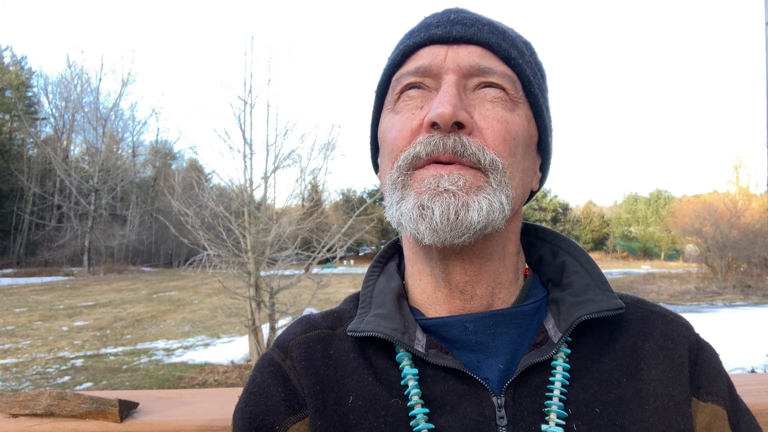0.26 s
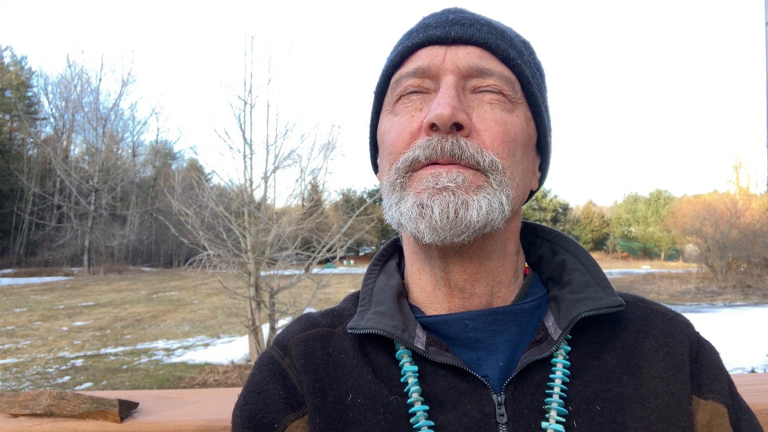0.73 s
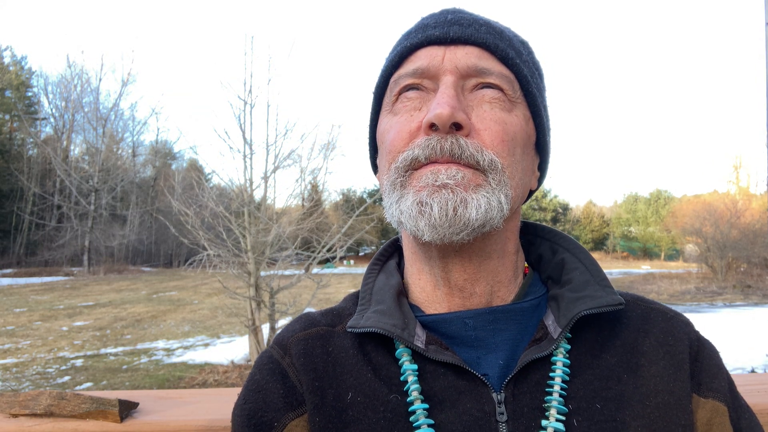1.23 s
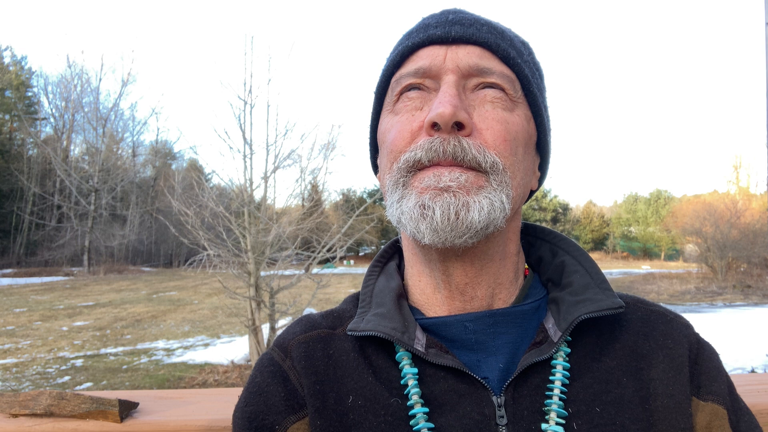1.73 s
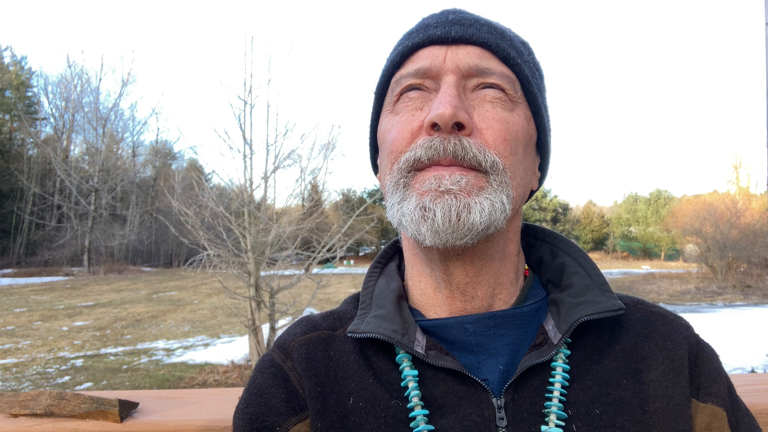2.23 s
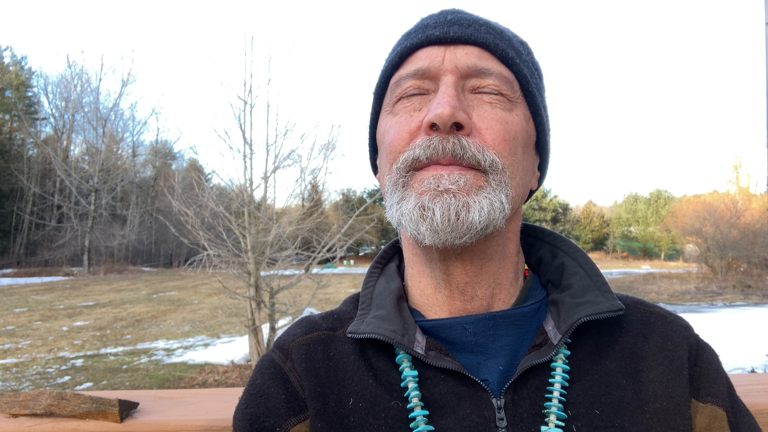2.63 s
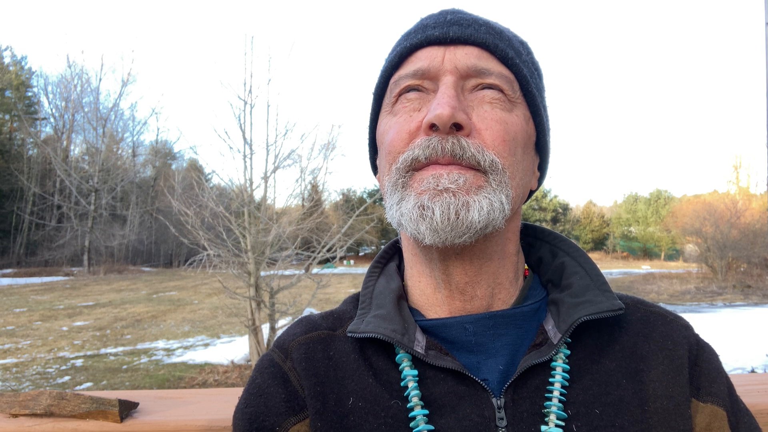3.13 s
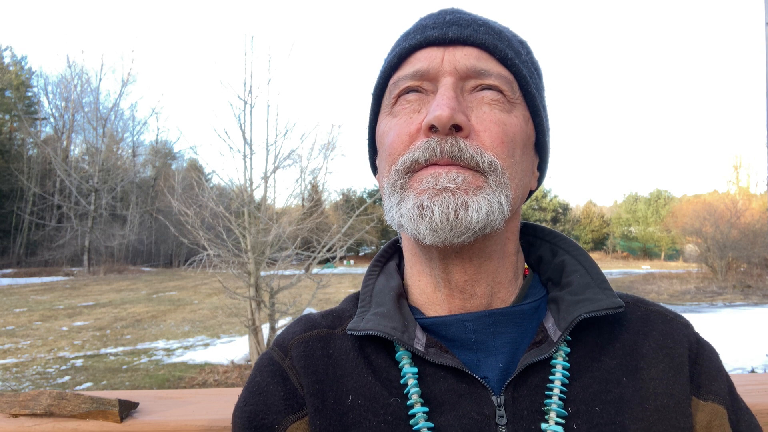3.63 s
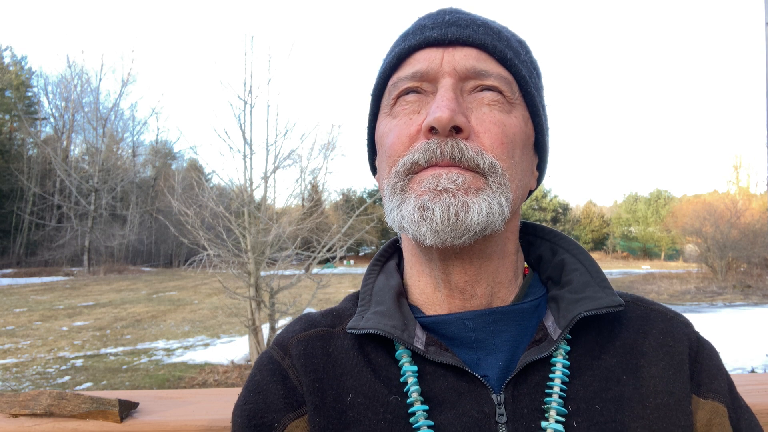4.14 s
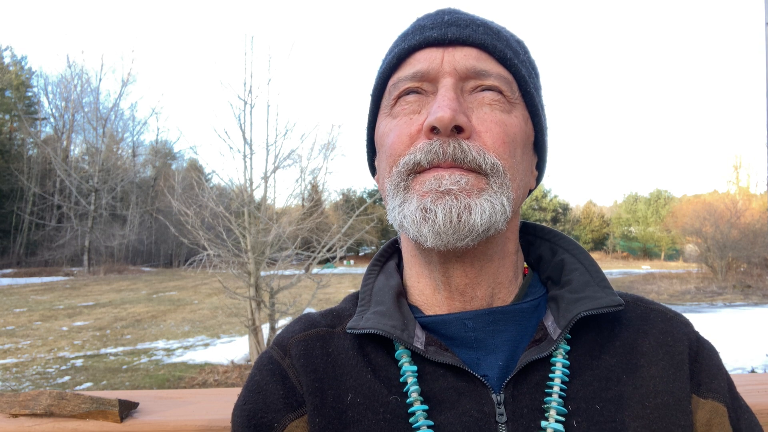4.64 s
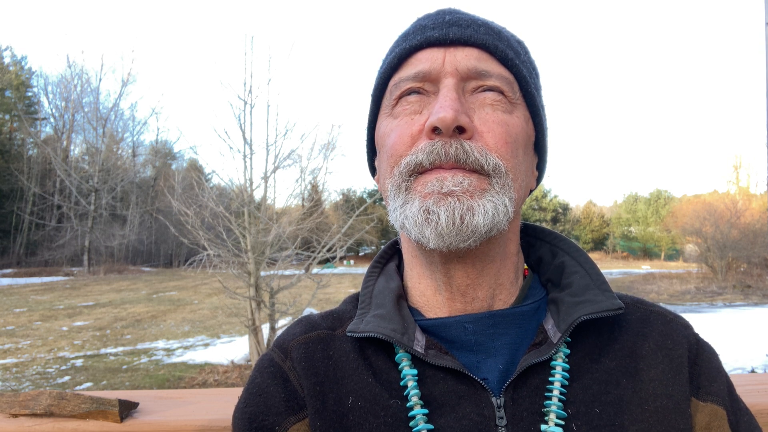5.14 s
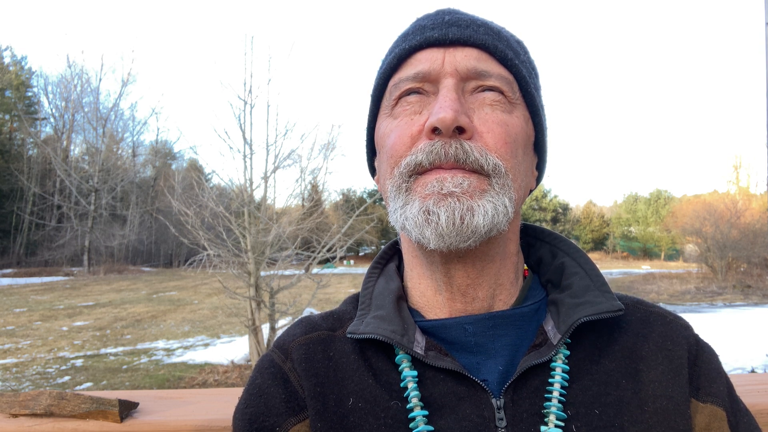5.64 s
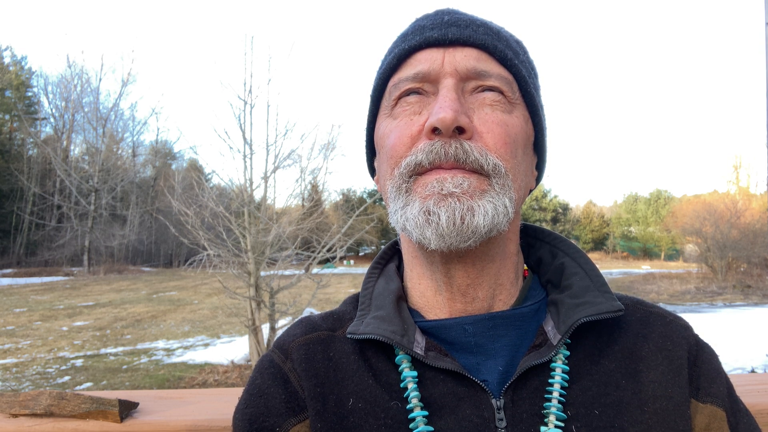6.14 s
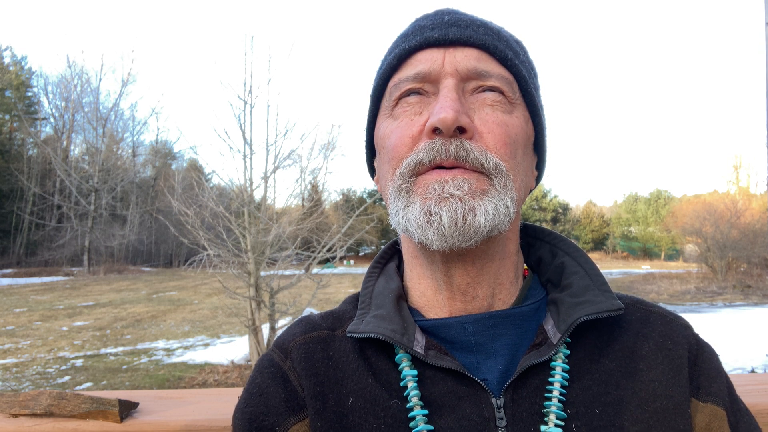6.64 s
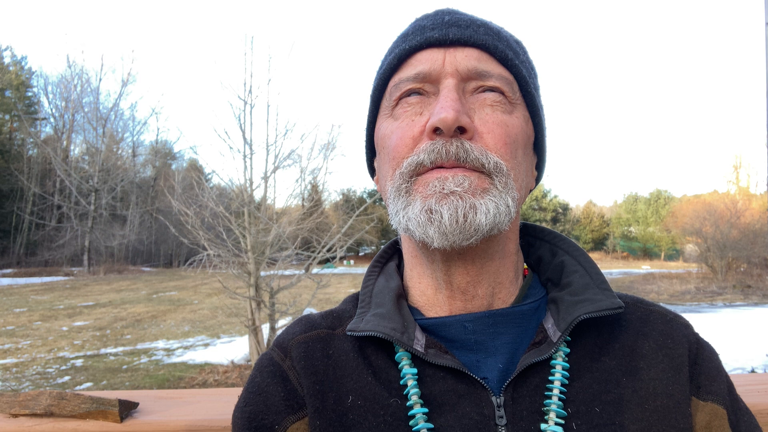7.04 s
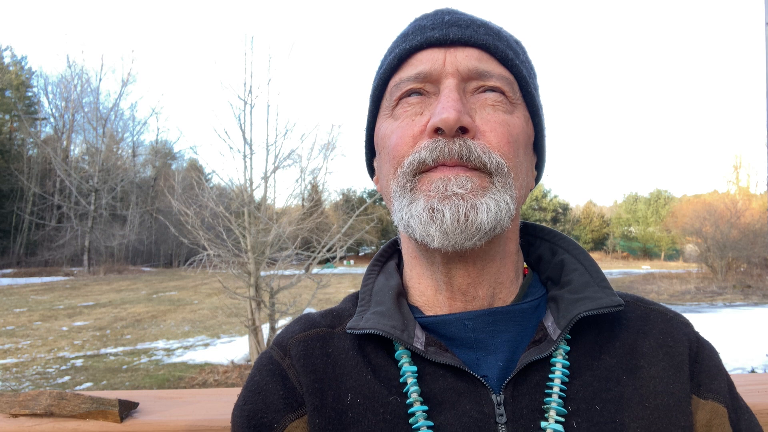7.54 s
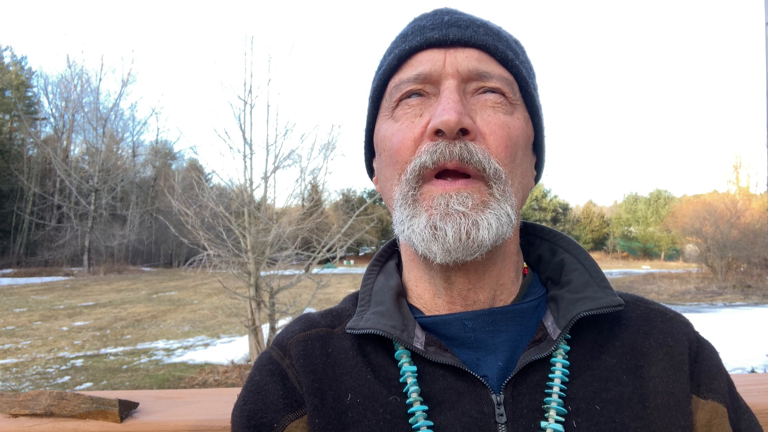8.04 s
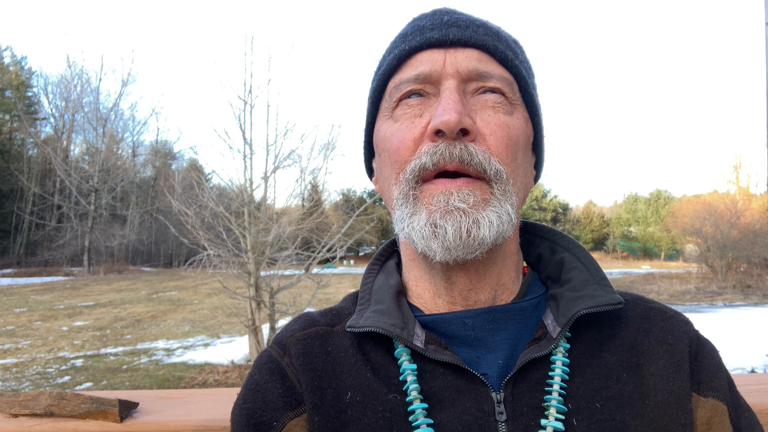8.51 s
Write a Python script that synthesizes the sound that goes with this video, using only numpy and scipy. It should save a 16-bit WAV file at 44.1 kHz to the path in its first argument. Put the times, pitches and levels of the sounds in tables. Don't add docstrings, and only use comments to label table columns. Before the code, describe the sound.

An open field edged by woods, heard through a small stereo microphone with faint steady hiss and a soft, far low hum. A crow caws immediately at 0.1 s, then at about 0.6, 1.2, 1.8, 2.3 and 2.8 s: single, short, raspy, arching calls, each followed by a long thin echo from the trees. From 3.5 s the caws continue at 4.1, 4.7, 5.4, 6.2, 6.9, 7.7 and 8.2 s, slightly wider apart, quieter and duller as the bird flies off. A smaller, higher crow answers very faintly at 7.4 s. Low, ragged wind thumps strike the microphone, strongest near 0.5, 1.2 and 2.3-3 s, again around 3.8-5 s, then mostly calm until a weak rumble near 8.4 s. Small dry contact ticks sound close by, most noticeable at 4.55, 6.6 and 8.1 s.

```python
import sys
import numpy as np
from scipy import signal
from scipy.fft import rfft, irfft, next_fast_len
from scipy.io import wavfile
from scipy.ndimage import uniform_filter1d, map_coordinates

SR = 44100
rng = np.random.default_rng(int(sys.argv[2]) if len(sys.argv) > 2 else 0)


def int16_out(signal):
    q = np.round(np.clip(np.atleast_2d(signal).T, -1, 1) * 32767)
    wavfile.write(sys.argv[1], SR, q.astype(np.int16))


def volts_from_decibels(level):
    exponent = np.asarray(level, float) / 20
    return 10 ** exponent


N = 386757
MARGIN = SR // 2
ANSWER_ABOVE_HZ = 700

# centre in Hz, width in Hz, level in dB.
BEAK_RESONANCES = [(2500, 630, -15), (3413, 500, 1.5), (4300, 1000, -8), (5300, 1430, -2)]


def unit(x):
    return x / np.sqrt(np.mean(x ** 2) + 1e-20)


def along(points, hz):
    f, v = np.transpose(points)
    return np.interp(np.log(hz + 1), np.log(f + 1), v)


def wobble(rate_hz, size=N):
    knots = rng.standard_normal(int(size * rate_hz / SR) + 4)
    return map_coordinates(knots, [np.arange(size) * rate_hz / SR])


def filtered(x, response):
    m = next_fast_len(x.shape[-1] + 8192)
    return irfft(rfft(x, m) * response(np.fft.rfftfreq(m, 1 / SR)), m)[..., :x.shape[-1]]


def turned(x, radians):
    return filtered(x, lambda hz: np.exp(.5j * radians(hz) * np.array([[1], [-1]])))


def panned(x, pan_db):
    return x * volts_from_decibels([[pan_db / 2], [-pan_db / 2]])


def add(out, x, start_s):
    i = round(start_s * SR) + MARGIN
    out[:, i:i + x.shape[-1]] += x


def rush(spectrum, alike, patchy_db):
    z = signal.stft(rng.standard_normal((2, N)), nperseg=1024)[2]
    field = uniform_filter1d(rng.standard_normal(z.shape[1:]), size=5, axis=0)
    field = uniform_filter1d(field, size=6, axis=1)
    pair = signal.istft(z * volts_from_decibels(patchy_db * unit(field)), nperseg=1024)[1][:, :N]

    def mid_side(hz):
        angle = np.arccos(np.clip(along(alike, hz), -1, 1)) / 2
        return volts_from_decibels(along(spectrum, hz)) * [np.cos(angle), np.sin(angle)]

    mid, side = filtered(pair, mid_side)
    return unit(np.array([mid + side, mid - side]))


def air():
    # time in seconds, wind strength in dB.
    wind = [(0.0, -59.5), (0.22, -62), (0.63, -56.5), (0.73, -65.5), (0.9, -68.5), (1.1, -69),
            (1.76, -62.5), (2.95, -70), (3.81, -57.5), (4.15, -67.5), (4.4, -62.5), (4.69, -59),
            (4.83, -59.5), (5.28, -62.5), (5.54, -66), (7.89, -66), (8.43, -61.5), (8.77, -68.5)]
    # frequency in Hz, level in dB per Hz.
    buffet_spectrum = [(15, -38), (28, -12.5), (55, 2.5), (100, -2), (200, -11), (330, -34), (600, -75)]
    hum_spectrum = [(100, -19.5), (200, -8), (310, -8.5), (480, -4), (800, -4.5), (1100, -8), (1700, -20),
                    (2200, -27.5), (4000, -32), (7000, -49)]
    hiss_spectrum = [(1000, -11), (3000, -14), (5000, 0), (6500, -1), (8800, 1.5), (11300, -0.5),
                     (14000, -2), (15100, -2), (15400, -49)]
    # frequency in Hz, likeness [0..1].
    hum_alike = [(100, 0.9), (400, 0.79), (700, 0.077), (1300, 0)]
    hiss_alike = [(3000, 0.1), (5000, 0.94), (7500, 0.46), (12000, 0.97)]

    wind_db = np.interp(np.arange(N) / SR, *np.transpose(wind))
    lumps = volts_from_decibels(2.56 * wobble(9) + 2.6 * wobble(25))
    buffet = rush(buffet_spectrum, [(60, 0.65), (250, 0.17)], patchy_db=1.5)
    buffet = volts_from_decibels(wind_db + 4) * unit(lumps * buffet)

    hum_db = -66.5 + 0.81 * wobble(0.74) + .8 * wobble(7.5)
    hum = panned(volts_from_decibels(hum_db) * rush(hum_spectrum, hum_alike, patchy_db=2.5), -1.4)

    steady = rush(hiss_spectrum, hiss_alike, patchy_db=0)
    hiss = volts_from_decibels(-85) * turned(steady, lambda hz: 2 * np.pi * (hz - 8850) / 5000)
    return buffet + hum + hiss


def thumps():
    # time in seconds, peak in dB, width in seconds.
    fronts = [(0.078, -34.5, 0.024), (0.241, -44, 0.01485), (0.396, -43.5, 0.02), (0.515, -23, 0.016),
              (0.604, -35.5, 0.046), (0.75, -42.5, 0.03), (0.836, -42.5, 0.019), (0.887, -42.5, 0.03),
              (1.239, -31, 0.00606), (1.249, -28.5, 0.014), (1.582, -45.5, 0.014), (1.676, -37, 0.026),
              (2.341, -31.5, 0.017), (2.404, -25.5, 0.016), (2.593, -26.5, 0.018), (2.867, -40.5, 0.013),
              (2.901, -34.5, 0.018), (2.974, -28.5, 0.024), (3.801, -34.5, 0.016), (3.933, -39, 0.017),
              (4.47, -40, 0.023), (4.604, -29.5, 0.011), (4.728, -39, 0.021), (4.771, -45, 0.023),
              (4.818, -29, 0.016), (5.136, -37, 0.025), (5.356, -45.5, 0.017), (8.261, -44.5, 0.015),
              (8.36, -41, 0.017), (8.528, -40.5, 0.051)]
    low_hz = 38
    out = np.zeros((2, N + SR))
    t = np.arange(SR // 4) / SR - .1
    for (s, db, width_s), (phase, skew, pan) in zip(fronts, rng.standard_normal((len(fronts), 3))):
        snap_hz = 115 + 1.17 * db - 400 * width_s
        sink = np.exp(-np.clip(t, -1.3 * width_s, 1) / (0.62 * width_s))
        pitch_hz = low_hz + (snap_hz - low_hz) * sink
        onset = np.exp(-(t / (0.59 * width_s)) ** 2)
        body = np.where(t < 0, onset, 1 / np.cosh(t / (0.53 * width_s)))
        port_skew = 0.39 * skew * np.array([[1], [-1]])
        cycle = 2 * np.pi * np.cumsum(pitch_hz) / SR + 9 * phase + port_skew
        eddies = volts_from_decibels(-17.5) * wobble(329.0, size=len(t)) * np.exp(-((t + 0.0086) / 0.032) ** 2)
        add(out, volts_from_decibels(db) * panned(body * np.sin(cycle) + eddies, 1.2 * pan), s - .1)
    return filtered(out[:, MARGIN:MARGIN + N], lambda hz: volts_from_decibels(along([(20, -19.0), (40, -1)], hz)))


def caw(top_hz, rise_s, fall_s, db, third_db, beak_db):
    # frequency in Hz, level in dB.
    throat_response = [(500, -34), (680, -25), (950, -30), (1090, -11), (1215, 0), (1300, -1), (1370, -6),
                       (1520, -7), (1620, -13), (1740, -10), (1880, -26), (2050, -25), (2500, -42),
                       (3600, -90)]
    t = np.arange(SR * 3 // 10) / SR - .12
    slack = (t / np.where(t < 0, rise_s, fall_s)) ** 2
    pitch_hz = top_hz * .76 ** slack ** 0.8 * (1 + .01 * wobble(121.8, size=len(t)))
    k = np.arange(1, 15)[:, None]
    size = .85 if top_hz > ANSWER_ABOVE_HZ else 1

    def throat(hz):
        mouth_db = along([(1420, 0.03), (1560, third_db)], hz)
        return volts_from_decibels(db + along(throat_response, hz * size) + mouth_db)

    def beak(hz):
        total = 0
        for (centre_hz, width_hz, own_db), gain_db in zip(BEAK_RESONANCES, beak_db):
            peak = volts_from_decibels(gain_db + own_db - 4.5)
            total = total + peak / (1 + (2 * (hz - centre_hz) / width_hz) ** 2) ** 2
        return total

    opening = 1 + 1.3 * np.clip(t, -.06, .07)
    beat_hz = 45 + 25 * rng.random()
    throb_db = 3 * np.sin(2 * np.pi * (beat_hz * t + rng.random()))
    flutter_db = np.minimum(1.7 * k, 5) * np.array([wobble(65, size=len(t)) for _ in k])
    jitter = np.cumsum(rng.standard_normal(len(t))) * .006
    cycle = 2 * np.pi * np.cumsum(pitch_hz) / SR + jitter
    harmonics = (throat(k * pitch_hz) + beak(k * pitch_hz / opening)) * np.sin(k * cycle)
    tone = (volts_from_decibels(throb_db + flutter_db) * harmonics).sum(0)

    puffs = rng.standard_normal(len(t)) * (1 + np.cos(cycle))
    shut = filtered(puffs, lambda hz: throat(hz) + volts_from_decibels(12) * beak(hz / opening[0]))
    wide = filtered(puffs, lambda hz: throat(hz) + volts_from_decibels(12) * beak(hz / opening[-1]))
    share = (opening - opening[0]) / np.ptp(opening)
    rasp = np.sqrt(1 - share) * shut + np.sqrt(share) * wide

    gate = 1 / (1 + (slack / np.where(t < 0, .85, 1.6)) ** np.where(t < 0, 7, 3))
    voice = (tone + rasp) * volts_from_decibels(-3 * np.minimum(slack, 9)) * gate
    return filtered(voice, lambda hz: volts_from_decibels(along([(6000, -2), (6500, -13.5)], hz)))


def paths():
    h = np.zeros(SR // 40)
    delay, size = rng.random((2, 5))
    h[(60 + 800 * delay).astype(int)] = .3 * (2 * size - 1)
    h[0] = 1
    return h / np.linalg.norm(h)


def woods(x, t60_scale, build_s):
    # frequency in Hz, t60 in seconds.
    decay = [(600, 0.87), (1300, 1.41), (2200, 1.68), (4000, 2), (8000, 0.71)]
    hz, t, z = signal.stft(rng.standard_normal((2, 2 * SR)), SR, nperseg=256)
    fade = volts_from_decibels(-60 * t / (t60_scale * along(decay, hz)[:, None]))
    tail = signal.istft(z * fade * (1 - np.exp(-t / build_s)), SR, nperseg=256)[1]
    return signal.fftconvolve(x[None], tail / np.linalg.norm(tail[0]), axes=1)


def crows():
    # top in seconds, top pitch in Hz, length in seconds, level in dB,
    # mouth opening as third-harmonic gain in dB.
    caws = [(0.115, 656, 0.13, -47.5, 2), (0.627, 682.5, 0.11, -46.5, 1), (1.247, 633.6, 0.13, -48, 1.7),
            (1.767, 674.4, 0.12, -47, -0.5), (2.271, 671.4, .124, -51, 0), (2.844, 655.5, 0.12, -49, -0.5),
            (3.525, 647, 0.12, -51, -0.5), (4.074, 661, 0.099, -54, -2.5), (4.674, 673, .121, -51.5, -2),
            (5.412, 643.7, 0.11, -56, 1), (6.185, 622.5, .122, -55, -5), (6.945, 640, .11, -58, 1.5),
            (7.444, 743, .088, -67, 9), (7.667, 662, 0.11, -58, -10), (8.248, 655.6, .125, -55, 2.5)]
    # time in seconds, distance in m, bearing as left lead in ms, height as ground-bounce lag in ms.
    flight = [
        (.11, 38, 0.24, 3.9),
        (.63, 26, 0.17, 4.1),
        (1.76, 64, 0.22, 4.15),
        (2.27, 27, 0.21, 4.0),
        (3.522, 67, 0.12, 3.98),
        (4.67, 230, 0.29, 5.94),
        (5.41, 180, 0, 5.5),
        (6.19, 120, -.05, 5.43),
        (8.25, 180, -0.12, 5.4),
    ]
    # frequency in Hz, gain in dB.
    trees = [(1000, 0), (1220, -2.5), (1350, 4), (1550, -1), (1900, 1.5), (3000, -3)]
    twigs = [(1500, -14), (2600, -9.5)]
    rise_share, ground_gain = .48, .7
    out = np.zeros((2, N + 4 * SR))
    path_s, *path = np.transpose(flight)
    centres_hz = [hz for hz, _, _ in BEAK_RESONANCES]
    for s, top_hz, length_s, db, third_db in caws:
        metres, lead_ms, lag_ms = (np.interp(s, path_s, column) for column in path)
        beak_db = db - 14.5 - metres * np.interp(centres_hz, (3500, 4600), (0.04, 0.2))
        pan_db = -3 if top_hz > ANSWER_ABOVE_HZ else 3.4 + 0.36 * s
        rise_s, fall_s = rise_share * length_s, (1 - rise_share) * length_s
        voice = caw(top_hz, rise_s, fall_s, db + 6.0, third_db, beak_db)

        def ground(hz):
            bounce = ground_gain * np.exp(-2j * np.pi * hz * lag_ms / 1000)
            return (1 + bounce) / np.hypot(1, ground_gain)

        def sides_gain(hz):
            return volts_from_decibels(np.outer([.5, -.5], along([(2000, pan_db), (2900, 3.0)], hz)))

        bounced = filtered(voice, ground)
        swayed = voice * (.7 + .7 * wobble(220, size=len(voice)))
        direct = filtered(np.convolve(bounced, paths()), sides_gain)
        direct = turned(direct, lambda hz: along([(1400, 7.85 * lead_ms), (1600, 1.3)], hz))
        add(out, direct, s - .12)

        scatter = filtered(voice, lambda hz: volts_from_decibels(along(twigs, hz)))
        add(out, woods(scatter, t60_scale=.2, build_s=.004), s - .118)

        late = filtered(swayed, lambda hz: volts_from_decibels(along(trees, hz)))
        echo = volts_from_decibels(-12) * woods(late, t60_scale=1.98, build_s=0.019)
        add(out, panned(echo, -1.6), s - .1)
    return out[:, MARGIN:MARGIN + N]


def ticks():
    # start in seconds, peak in dB, pitch in Hz, t60 in seconds, left over right in dB.
    contacts = [(.957, -73, 2620, 0.011, 0), (3.197, -75, 9300, 0.0046, 7),
                (4.291, -70.5, 4300, 0.0059, 13), (4.412, -76.5, 4270, .006, -4),
                (4.43, -76, 6010, 0.0039, -2), (4.549, -47, 1180, 0.016, -7), (4.553, -50, 403, 0.032, 2),
                (4.549, -67.5, 2500, 0.03, 5), (4.55, -59, 4730, 0.0033, -13), (5.01, -77, 499, .015, 12),
                (6.601, -56, 1270, 0.026, -6), (7.575, -80, 3580, 0.0057, -19),
                (7.623, -69.5, 9800, 0.0069, 2), (7.83, -66, 3250, 0.003, -2),
                (8.019, -70, 13800, 0.0043, -2), (8.112, -47.5, 2690, 0.0021, -13),
                (8.113, -72.5, 8500, 0.0067, 1), (8.621, -65, 14300, .005, 3)]
    out = np.zeros((2, N + SR))
    t = np.arange(SR // 20) / SR
    for s, db, hz, t60_s, pan_db in contacts:
        onset = 1 - np.exp(-(t * hz / 0.99) ** 2)
        ring = volts_from_decibels(db + 6.5 - 60 * t / t60_s) * onset * np.sin(2 * np.pi * hz * t)
        add(out, panned(ring, pan_db), s)
    return out[:, MARGIN:MARGIN + N]


def scene():
    return air() + thumps() + crows() + ticks()


def low_pass(x):
    return signal.sosfilt(signal.butter(12, 15260, fs=SR, output="sos"), x)


def record(dry):
    return low_pass(dry)


dry = scene()
out = record(dry)
int16_out(out)
```